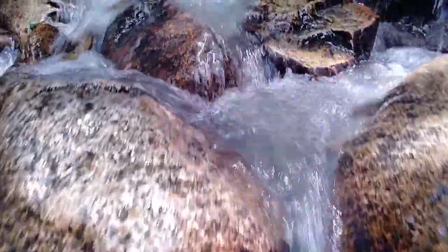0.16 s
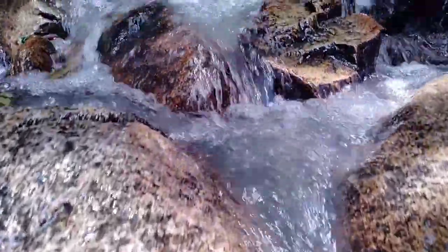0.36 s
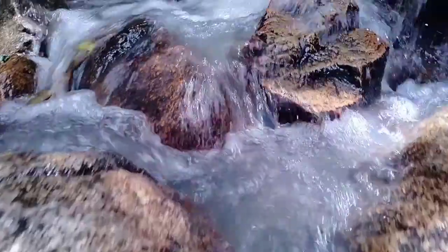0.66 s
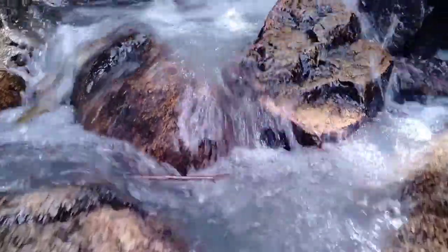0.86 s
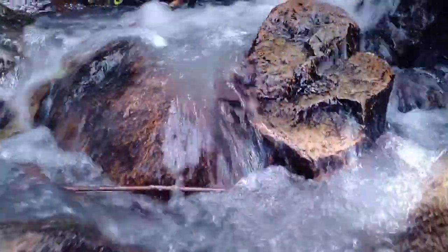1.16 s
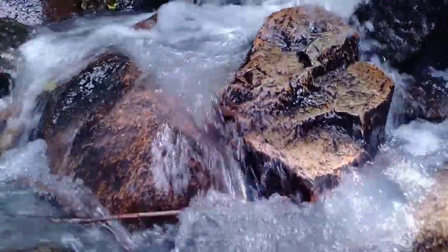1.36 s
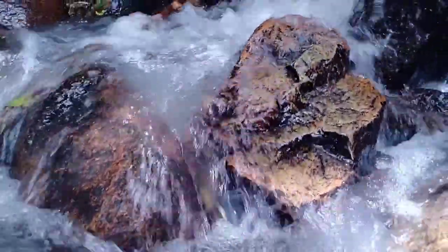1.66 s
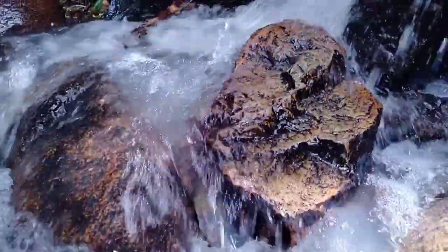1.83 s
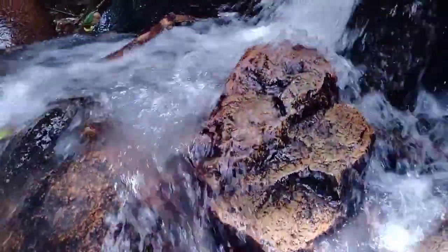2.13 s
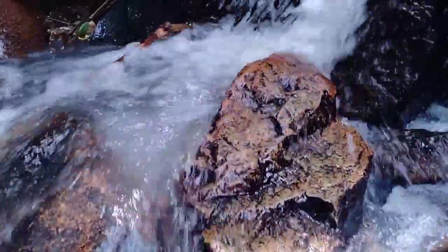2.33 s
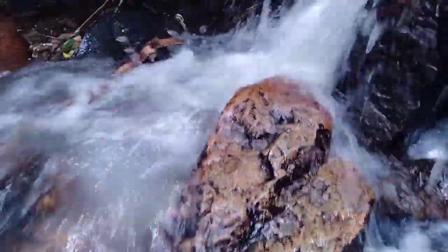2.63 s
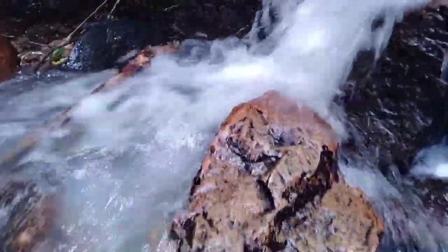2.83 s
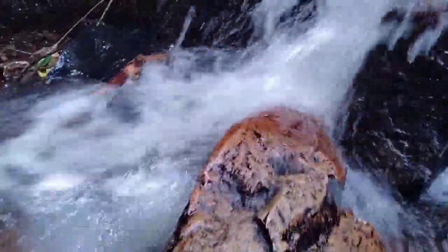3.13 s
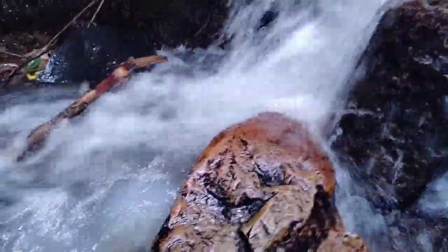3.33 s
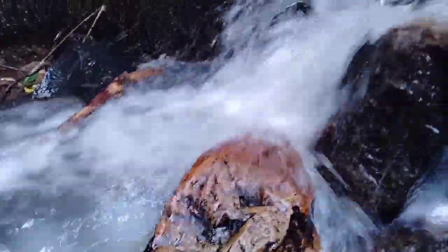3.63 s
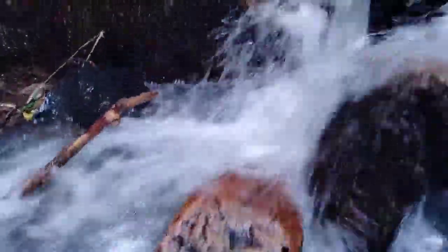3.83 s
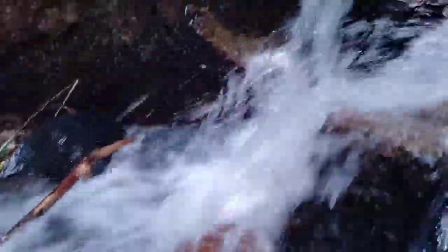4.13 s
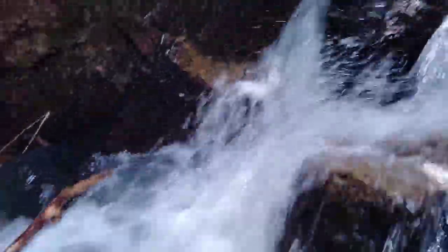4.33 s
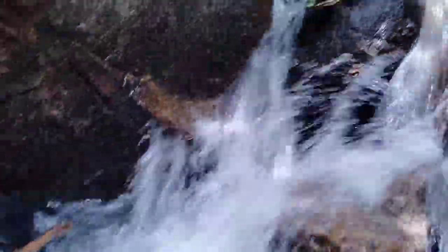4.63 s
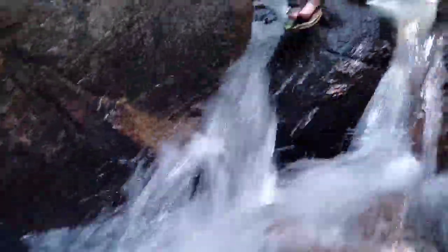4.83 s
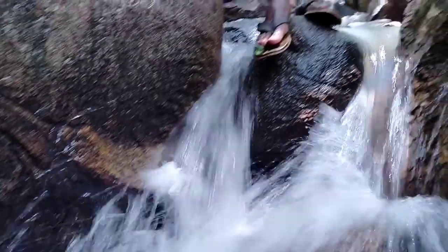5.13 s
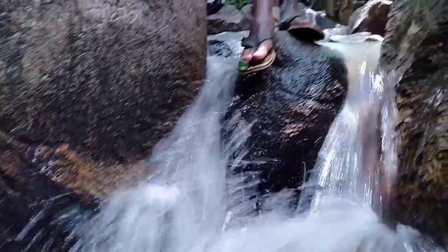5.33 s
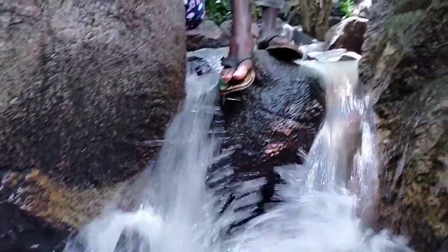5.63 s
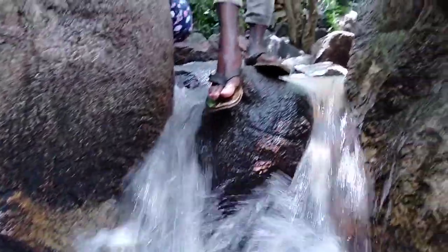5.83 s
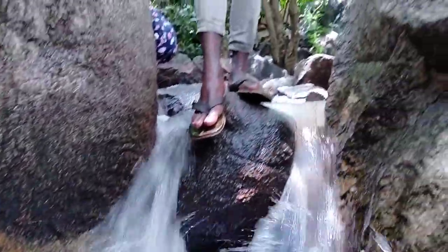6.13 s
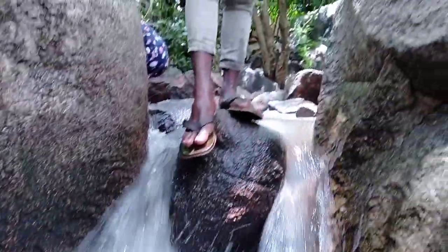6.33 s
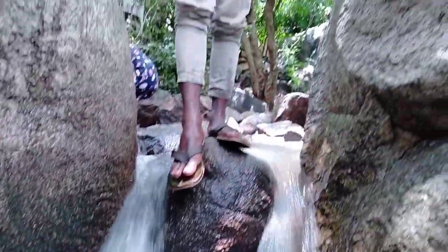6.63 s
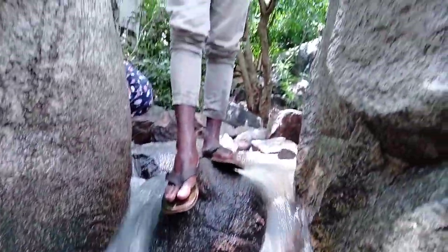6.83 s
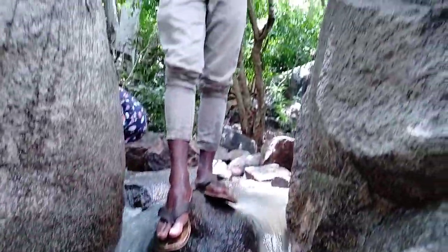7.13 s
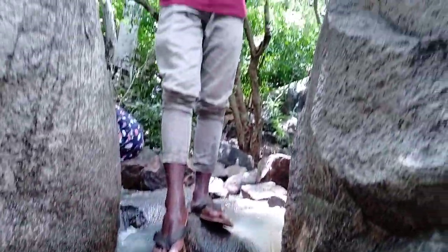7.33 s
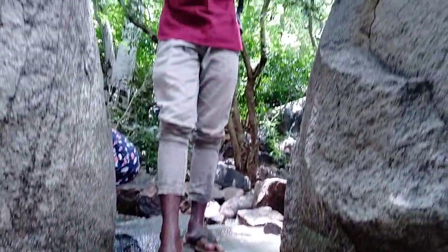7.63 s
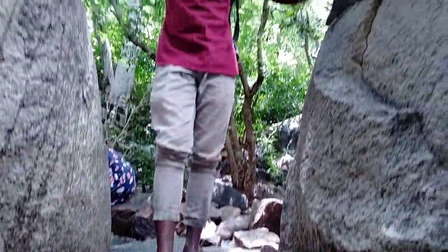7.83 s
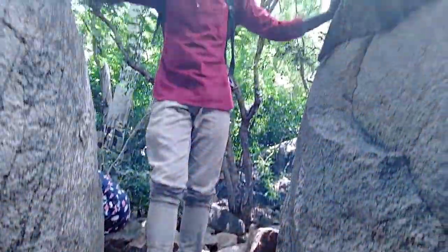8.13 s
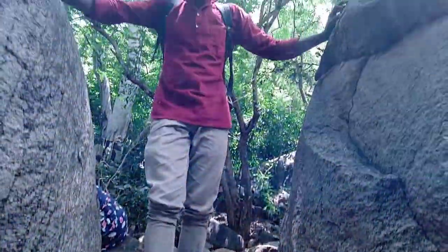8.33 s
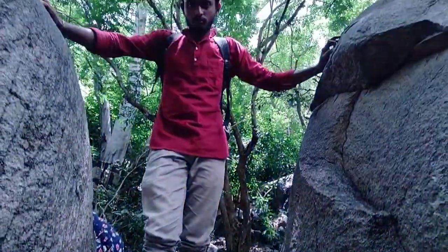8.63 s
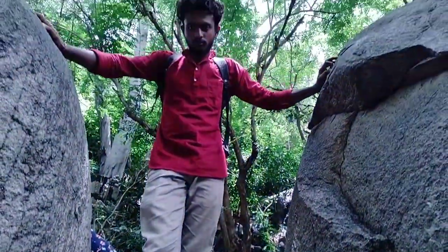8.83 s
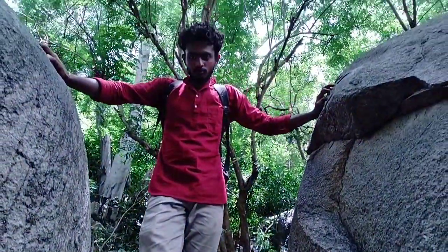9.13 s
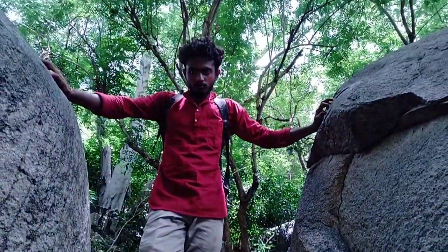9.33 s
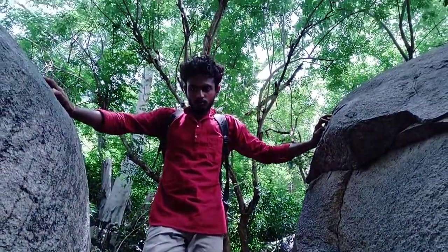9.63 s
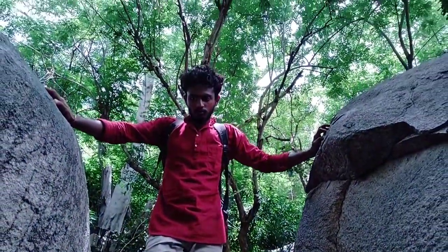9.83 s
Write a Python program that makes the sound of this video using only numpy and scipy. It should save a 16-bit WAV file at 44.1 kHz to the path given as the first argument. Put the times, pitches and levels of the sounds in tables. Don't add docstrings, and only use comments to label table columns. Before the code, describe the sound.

Muffled, slowed rushing water from a little fall among rocks, microphone about an arm's length away, dry and mono. Round bubble tones from low to middling pitch pop and ring irregularly over a constant gurgling rush, with low thuds and faint dull spray. After a busier swell of gulps, a single hard, distorted bloop clicks, and afterwards the same stream sounds clearly lower in volume.

```python
import sys
import numpy as np
from scipy import signal
from scipy.fft import rfft, irfft, next_fast_len
from scipy.io import wavfile
from scipy.ndimage import uniform_filter1d, minimum_filter1d

SR = 44100
rng = np.random.default_rng(int(sys.argv[2]) if len(sys.argv) > 2 else 0)


def gain_from_decibels(decibels):
    exponent = np.asarray(decibels, float) / 20
    return 10 ** exponent


def to_wav(sig):
    pcm = np.clip(np.atleast_2d(sig), -1, 1) * 32767
    pcm = np.round(pcm).astype(np.int16)
    wavfile.write(sys.argv[1], SR, pcm.T)


N = 439236

# moment of peak in [s], peak in [dB], pitch in [Hz], length in
# [ms].
DEEP_GULPS = [(0.801, -23, 427, 6.7), (1.173, -21.5, 316, 26), (1.457, -18, 330, 7.3),
              (4.754, -27.5, 376, 22), (1.875, -17, 387, 12), (1.946, -17, 231, 14.5),
              (2.091, -20, 310, 4.9), (2.217, -23.5, 264, 17.4), (2.613, -19, 492, 22),
              (3.505, -12, 442, 7.7), (3.63, -21.5, 394, 18), (3.797, -9.5, 412, 7.9),
              (3.934, -11.5, 356, 4.5), (5.092, -15.5, 339, 7.9), (9.389, -22.5, 271, 21),
              (5.437, -21, 386, 19), (6.245, -17.5, 260, 16), (6.622, -18, 462, 10),
              (6.686, -12, 310, 14.5), (6.875, -18, 333, 10.4), (6.916, -16.5, 255, 3.7),
              (7.251, -28, 291, 12), (7.437, -15.5, 495, 30), (7.781, -12.5, 398, 9.8),
              (7.82, -15.5, 423, 9.4), (8.069, -17, 490, 9.1), (8.761, -15, 375, 14), (9.086, -19, 445, 15),
              (9.579, -15.5, 475, 8.9), (9.778, -16, 487, 7.4)]
# moment of peak in [s], peak in [dB], pitch in [Hz], length in [ms].
MIDDLE_GULPS = [(0.008, -16.5, 880, 9.9), (0.099, -20.5, 514, 10.3), (0.594, -20, 513, 12),
                (1.263, -10, 593, 6.3), (1.32, -17.5, 670, 10.4), (1.467, -19.5, 810, 5.2),
                (1.946, -0.5, 683, 6.4), (5.535, -22.5, 523, 9), (2.221, -16, 795, 12.6),
                (6.21, -20, 750, 15.5), (3.236, -18.5, 810, 14), (4.04, -14.5, 498, 9),
                (3.82, -14.5, 757, 11.2), (3.857, -18, 512, 13.3), (4.026, -12, 546, 5.8),
                (4.622, -16, 900, 9.2), (4.85, -9, 890, 5.6), (5.368, -23, 700, 13),
                (5.418, -17.5, 887, 13.6), (5.908, -17, 586, 3.3), (6.485, -7, 542, 4.4),
                (6.693, -8.5, 562, 7.3), (6.781, -15, 650, 14.6), (6.82, -11.5, 829, 11.7),
                (6.912, -21, 528, 8.2), (7.077, -16.5, 586, 11.4), (7.935, -21.5, 540, 9),
                (8.388, -18, 756, 22), (8.496, -19.5, 623, 12.2), (8.676, -17.5, 613, 12.4)]
# moment of peak in [s], peak in [dB], pitch in [Hz], length in [ms].
HIGH_GULPS = [(0.08, -20, 1530, 6.8), (0.354, -24.5, 1178, 21.7), (0.588, -17, 987, 9),
              (0.849, -23, 974, 9), (0.922, -18, 894, 5.9), (0.971, -20, 1407, 9.4),
              (1.355, -18, 1040, 4.4), (1.896, -19.5, 1120, 11.8), (2.044, -23.5, 970, 10.2),
              (2.853, -21, 989, 20.3), (0.704, -24, 1205, 7.26), (3.342, -19.5, 943, 7),
              (3.545, -17.5, 1034, 4.3), (3.791, -17, 910, 9), (3.809, -18.5, 1363, 9.3),
              (4.207, -22.5, 1004, 4.4), (0.966, -19, 850, 9.4), (5.308, -22.5, 998, 19.5),
              (5.562, -16.5, 976, 8.5), (5.718, -18.5, 1245, 4), (6.18, -20.5, 1030, 3),
              (6.454, -19.5, 1005, 5.5), (6.977, -20, 1040, 3.9), (7.203, -21.5, 985, 8.1),
              (8.099, -7, 1283, 6.4), (8.843, -21.5, 1160, 4.1), (8.88, -16, 980, 14),
              (9.326, -20, 875, 11.6), (9.481, -10, 1023, 9.7), (9.578, -18, 946, 6.6)]
# moment of peak in [s], peak in [dB],
# pitch in [Hz], length in [ms].
SHED_GULPS = [
    (7.661, -25.5, 300, 8.1),
    (7.660, -22, 731, 10),
    (7.688, -26, 950, 7.9),
    (9.3, -26, 305, 10),
    (7.755, -22.5, 770, 14),
]
# time in [s], level in [dB rms], centre in
# [Hz].
BRIGHT_CRACK = [
    (7.669, -32, 1710),
    (7.672, -39, 2600),
]
# time in [s], level in [dB rms], centre in [Hz].
SPLASHES = [(0.085, -31, 1770), (0.209, -36.5, 1740), (0.518, -43, 1910), (0.801, -42.5, 2820),
            (0.847, -37, 1930), (0.962, -41.5, 1930), (1.022, -41, 2780), (1.033, -39, 1790),
            (1.318, -33.5, 1900), (1.613, -42, 2700), (1.702, -39, 1780), (6.807, -27, 1510),
            (2.991, -43, 2780), (3.051, -40, 1918), (3.746, -43, 1770), (3.807, -44, 2760),
            (4.117, -41, 1900), (0.76, -42, 2900), (5.085, -45, 1910), (5.126, -39.5, 2837),
            (5.614, -38.5, 1920), (5.625, -44, 2800), (1.461, -31, 1500), (6.859, -34.5, 1830),
            (8.095, -46, 1890), (8.114, -41, 2870), (8.282, -39, 1940), (9.476, -44, 1880),
            (0.115, -43.5, 2780), (9.822, -40, 1840)]
# time in [s], level in [dB rms].
SLAPS = [(0.451, -38), (0.844, -36), (0.896, -33), (1.003, -35), (1.267, -36.5), (1.318, -33.5),
         (1.464, -28), (1.941, -41), (2.826, -38), (3.131, -34), (3.504, -28), (3.798, -25.5),
         (3.935, -27.5), (4.068, -34), (4.469, -25.5), (5.1, -40), (5.595, -38.5), (6.498, -31),
         (6.697, -23), (6.879, -25), (7.128, -41), (7.675, -43), (8.082, -34), (8.447, -38), (8.76, -32),
         (9.095, -41), (9.572, -37)]
# time in [s], level in [dB rms], centre in [Hz].
DROPLETS = [
    (1.83, -39, 2970),
    (4.257, -46, 3130),
    (9.79, -42, 2840),
]
# time in [s], level in [dB].
FLOW = [(0.0, -26.5), (1.0, -26.5), (1.4, -25.5), (1.9, -24.5), (2.4, -24.5), (3.35, -26.5), (3.9, -23.5),
        (4.2, -26), (5.8, -25), (6.2, -26.5), (6.9, -21.5), (7.52, -26), (8.54, -26.5), (8.93, -23.5),
        (9.35, -27), (9.6, -23), (9.96, -26.5)]
# frequency in [Hz], density in [dB per Hz].
BED_COLOUR = [(88, -46.5), (150, -22.5), (257, -4), (403, -4.5), (488, -0.5), (774, -0.5), (846, 2),
              (980, 0), (1270, -3), (2200, -28), (2860, -58.5), (4840, -120)]
# frequency in [Hz], density in [dB per Hz].
SPRAY_COLOUR = [(1100, -39), (1600, -15), (2100, -24), (2600, -19.5), (3050, -20.5), (3300, -24.5),
                (3550, -32), (3800, -35), (4050, -42), (4400, -63.5)]
# frequency in [Hz], density in [dB per Hz].
THUD_COLOUR = [(14, -50), (25, -26), (45, -16.5), (80, -7), (125, -10), (165, -2.5), (230, -7.5),
               (300, -31.5)]

OVERLOAD_S, LOUDEST_HZ = 7.6705, 1037


def rms_one(x):
    return x / np.sqrt(np.mean(x ** 2) + 1e-20)


def at_hz(points, hz):
    point_hz, point_db = np.transpose(points)
    return np.interp(np.log(hz), np.log(point_hz), point_db, -90, -90)


def drift(rate):
    r = np.exp(-80 * np.pi * rate / SR)
    sparse = rng.standard_normal(N // 40 + 2002)
    slow = signal.lfilter([1], [1, -2 * r, r * r], sparse)[2000:]
    return np.interp(np.arange(N) / 40, np.arange(len(slow)), rms_one(slow))


def loudest_gulp():
    t = np.arange(N) / SR - OVERLOAD_S
    swell = np.exp(-(t / .0052) ** 4)
    decay = 1 / np.cosh(np.minimum(t / .0048, 50) ** 1.5)
    tone = np.sin(2 * np.pi * LOUDEST_HZ * t) + .03 * np.sin(5.6 * np.pi * LOUDEST_HZ * t)
    return 1.1 * np.where(t < 0, swell, decay) * tone


def gulps(table):
    out, chance = np.zeros(N), rng.random((len(table), 5))
    wobble = gain_from_decibels(1.8 * drift(80))
    late = 1.7 * chance[:, 2] - .6
    detune = (1.1 + .2 * chance[:, 3]) ** np.sign(chance[:, 4] - .5)
    start, peak, pitch, length = table.T
    daughters = np.transpose([start + late * length / 1000, peak - 7.5, pitch * detune, length])
    pockets = np.r_[table, daughters]
    for (s, peak_db, hz, ms), (turn, climb) in zip(pockets, np.r_[chance, chance][:, :2]):
        u = np.arange(-2, 3.5, 1000 / SR / ms)
        shape = np.where(u < 0, np.exp(-(u / .7) ** 2), 1 / np.cosh(u / .4))
        cycles = hz * ms / 1000 * (u + .025 * climb * u ** 2) + turn
        tone = gain_from_decibels(peak_db + 3.5) * shape * np.sin(2 * np.pi * cycles)
        at = round((s - 2.05 * ms / 1000) * SR) + np.arange(len(u))
        inside = (at >= 0) & (at < N)
        out[at[inside]] += tone[inside]
    return out * wobble


def stray_gulps(count=90):
    when, strength, pitch, ring = rng.random((count, 4)).T
    low_hz, high_hz, cycles = 377, 1507, 8.0
    hz = low_hz * (high_hz / low_hz) ** pitch
    peak_db = -28 + 1.5 * (strength - .5)
    return np.transpose([when * (N / SR - .1), peak_db, hz, 1000 * cycles * (.5 + ring) / hz])


def bursts(rows, spread, length_s):
    out, half = np.zeros(N), round(.08 * SR)
    t = np.arange(-half, half) / SR
    shape = np.exp(-(t / length_s) ** 2)
    for (s, level_db, hz), white in zip(rows, rng.standard_normal((len(rows), 2 * half))):
        band = signal.butter(3, [hz / spread, hz * spread], "band", fs=SR, output="sos")
        noise = signal.sosfilt(band, white)
        puff = gain_from_decibels(level_db) * rms_one(noise * shape) * np.sqrt(np.mean(shape ** 2))
        at = round(s * SR) + np.arange(-half, half)
        out[at[at >= 0]] += puff[at >= 0]
    return out


def froth(pockets):
    lag_s = 0.002996
    rows = [(s + lag_s, peak_db - 11.5, hz) for s, peak_db, hz, ms in pockets]
    return bursts(rows + [(OVERLOAD_S, -25, LOUDEST_HZ)], spread=1.303, length_s=0.015)


def bubbles(surge_db):
    per_s, ring_cycles = 900, 11.7
    sizes = gain_from_decibels(3.5 * np.minimum(rng.exponential(1, N), 4)) * rng.choice([-1, 1], N)
    born = rng.random(N) < per_s * gain_from_decibels(surge_db) / SR
    pitches, dealt, out = np.geomspace(190, 1900, 22), rng.integers(0, 22, N), np.zeros(N)
    for k, hz in enumerate(pitches):
        r, w = gain_from_decibels(-60 * hz / (2.2 * ring_cycles * SR)), 2 * np.pi * hz / SR
        poles = [1, -2 * r * np.cos(w), r * r]
        once = signal.lfilter([1], poles, sizes * born * (dealt == k) + 1e-18)
        ring = signal.lfilter([1], poles, once)
        out += rms_one(ring) * gain_from_decibels(at_hz(BED_COLOUR, hz)) * np.sqrt(hz)
    return rms_one(out)


def rush(spectrum, surge_db, own_db, own_rate, count=3):
    size = next_fast_len(N)
    hz = np.maximum(np.fft.rfftfreq(size, 1 / SR), 1)
    coloured = rfft(rng.standard_normal(size)) * gain_from_decibels(at_hz(spectrum, hz))
    out, octave = np.zeros(N), count * np.log2(hz)
    lowest = int(count * np.log2(spectrum[0][0]))
    highest = int(count * np.log2(spectrum[-1][0])) + 1
    for k in range(lowest, highest + 1):
        patch = irfft(coloured * np.clip(1 - abs(octave - k), 0, 1), size)[:N]
        out += patch * gain_from_decibels(surge_db + own_db * drift(own_rate))
    return rms_one(out)


def running_water():
    t = np.arange(N) / SR
    bed_db = np.interp(t, *np.transpose(FLOW))
    spray_db = -46 + 0.95 * (bed_db - bed_db.mean()) + 0.5 * (t > OVERLOAD_S)
    surge = rms_one(drift(8) + .4 * drift(25))
    bed = gain_from_decibels(-4.0) * rush(BED_COLOUR, 0.98 * surge, own_db=5.5, own_rate=12)
    bed += gain_from_decibels(-2.5) * bubbles(2.5 * surge)
    spray = rush(SPRAY_COLOUR, 1.2 * surge + 1.3 * drift(28), own_db=2.3, own_rate=28, count=5)
    thud = rush(THUD_COLOUR, 1.6 * surge, own_db=1.2, own_rate=8)
    return gain_from_decibels(bed_db) * bed + gain_from_decibels(spray_db) * spray + gain_from_decibels(bed_db - 23.5) * thud


def scene():
    water = running_water()
    pockets = np.r_[DEEP_GULPS, MIDDLE_GULPS, HIGH_GULPS, SHED_GULPS, stray_gulps()]
    ringing = loudest_gulp() + gulps(pockets)
    breaking = froth(pockets) + bursts(SPLASHES, spread=1.12, length_s=.019)
    breaking += bursts([(s, level_db, 185) for s, level_db in SLAPS], spread=1.4, length_s=0.014)
    breaking += bursts(BRIGHT_CRACK, spread=3.0, length_s=0.0052)
    breaking += bursts(DROPLETS, spread=1.04, length_s=0.023)
    return (ringing + breaking + water)[None]


def duck_db():
    t = np.maximum(np.arange(N) / SR - OVERLOAD_S - .028, 0)
    fall_s, recover_s = 0.0069, 0.17
    return (1 - np.exp(-t / fall_s)) * (-8 - 2.5 * np.exp(-t / recover_s))


def limiter(x):
    ceiling = .66 + .11 * np.exp(-((np.arange(N) / SR - OVERLOAD_S) / .006) ** 4)
    need = np.minimum(1, ceiling / (abs(x) + 1e-9))
    held = minimum_filter1d(need, size=301)
    return x * uniform_filter1d(uniform_filter1d(held, size=100), size=100)


def low_pass(x):
    return signal.sosfilt(signal.butter(12, 15500, fs=SR, output="sos"), x)


def record(dry):
    dull = signal.sosfilt(signal.cheby2(9, 62, 4800, fs=SR, output="sos"), dry)
    clipped = np.clip(limiter(dull * gain_from_decibels(duck_db())), -.71, .71)
    hiss_db = -88.5 + 3.5 * (np.arange(N) < OVERLOAD_S * SR)
    hiss = gain_from_decibels(hiss_db) * rng.standard_normal(dry.shape)
    return low_pass(clipped + hiss)


dry = scene()
out = record(dry)
to_wav(out)
```